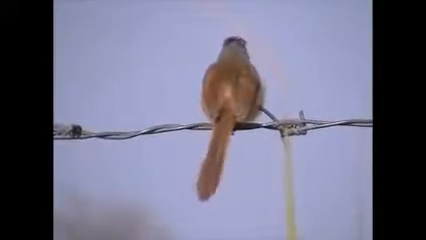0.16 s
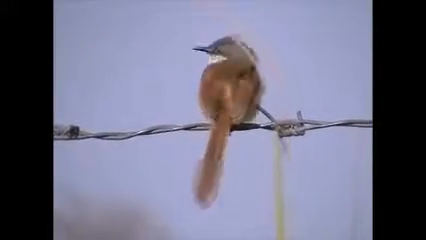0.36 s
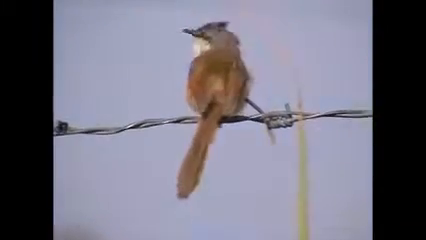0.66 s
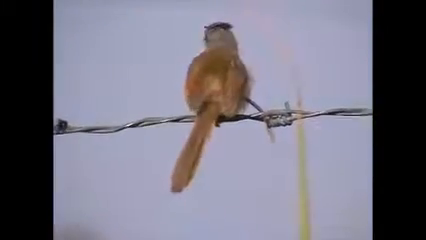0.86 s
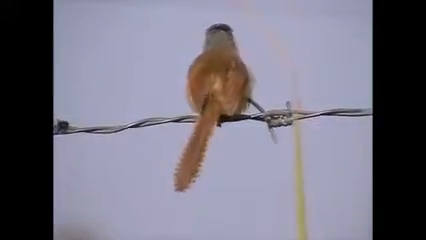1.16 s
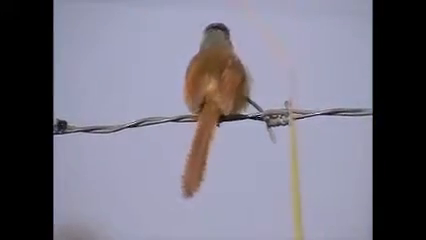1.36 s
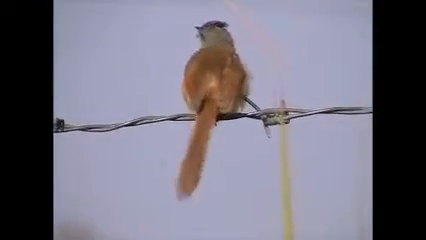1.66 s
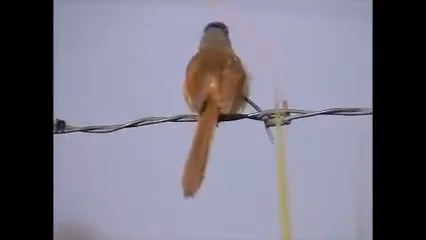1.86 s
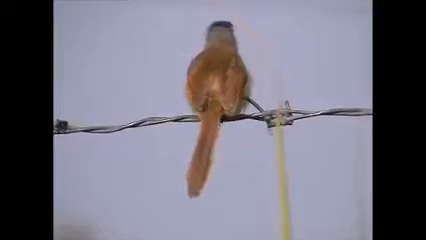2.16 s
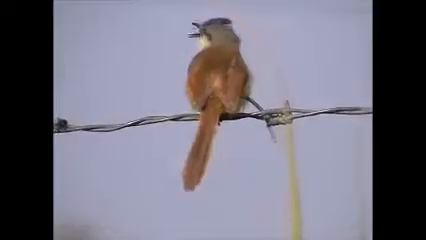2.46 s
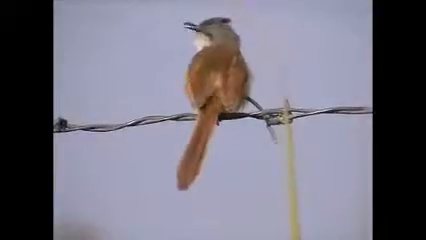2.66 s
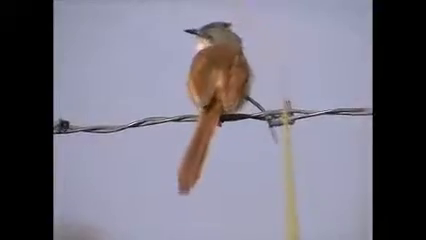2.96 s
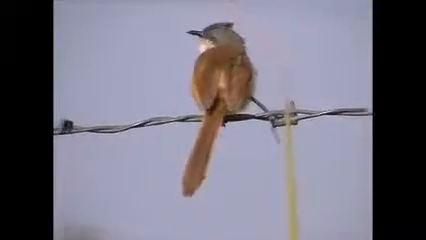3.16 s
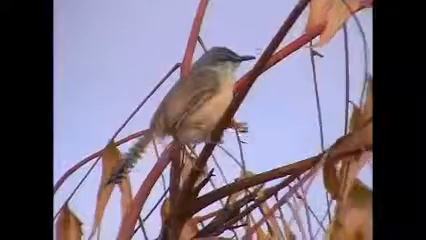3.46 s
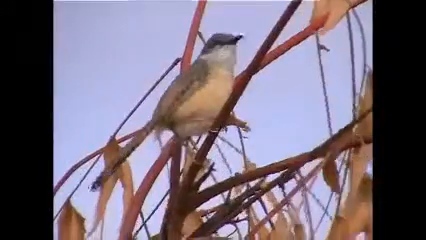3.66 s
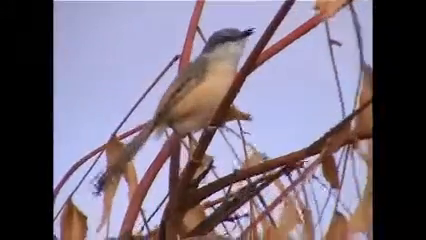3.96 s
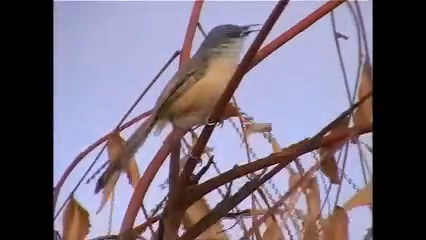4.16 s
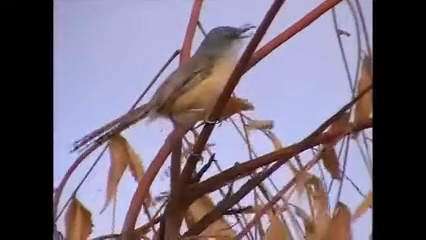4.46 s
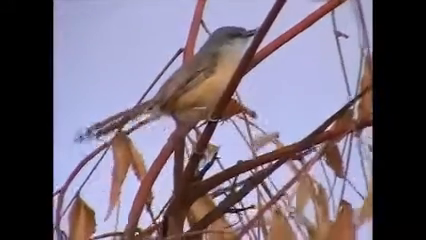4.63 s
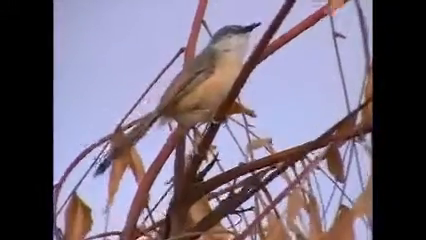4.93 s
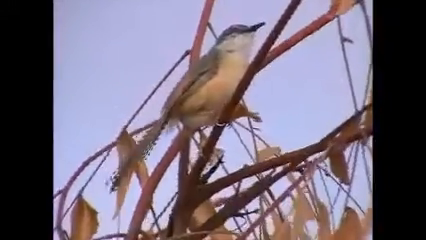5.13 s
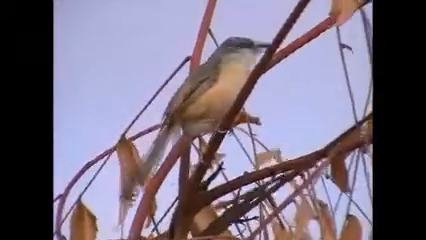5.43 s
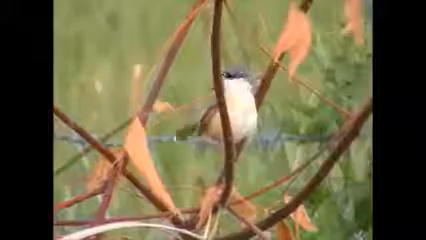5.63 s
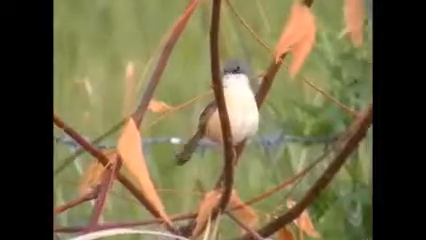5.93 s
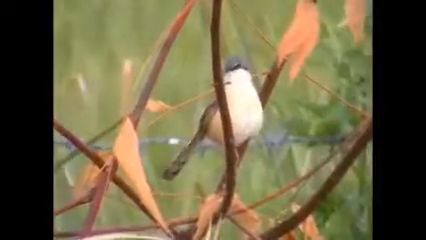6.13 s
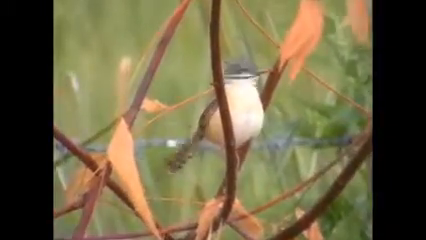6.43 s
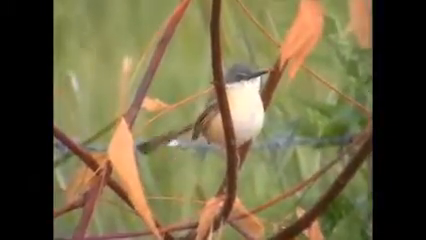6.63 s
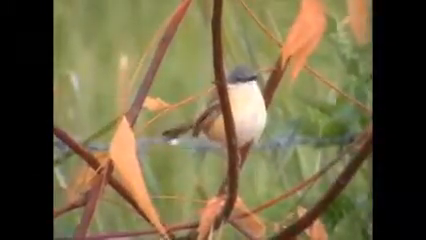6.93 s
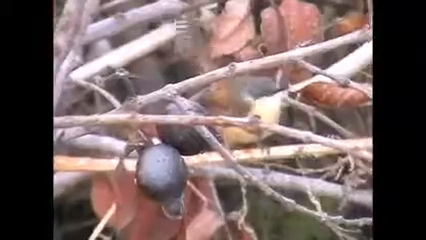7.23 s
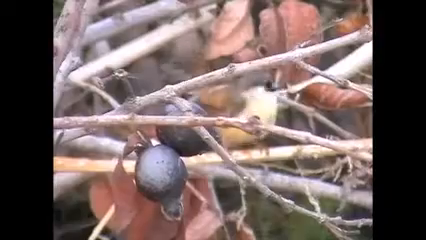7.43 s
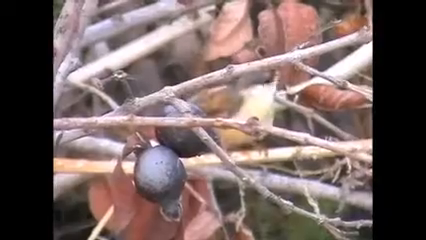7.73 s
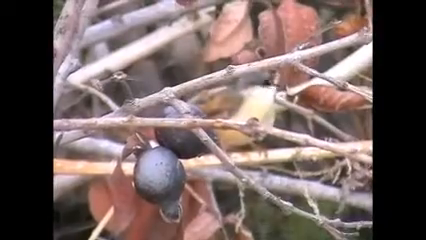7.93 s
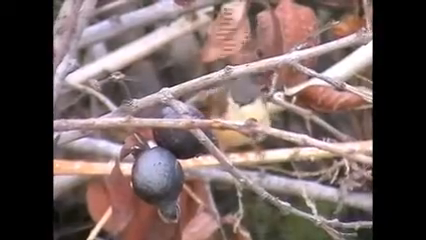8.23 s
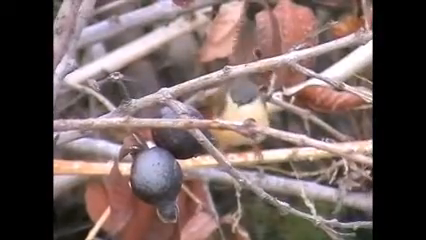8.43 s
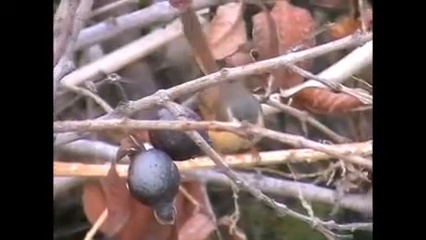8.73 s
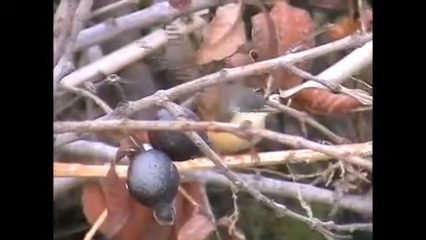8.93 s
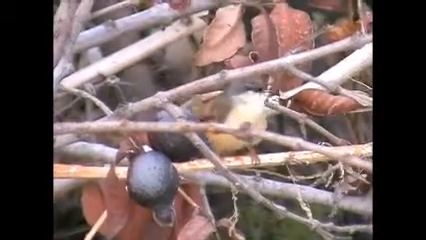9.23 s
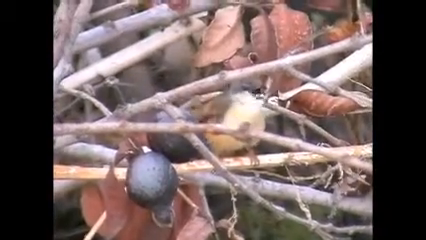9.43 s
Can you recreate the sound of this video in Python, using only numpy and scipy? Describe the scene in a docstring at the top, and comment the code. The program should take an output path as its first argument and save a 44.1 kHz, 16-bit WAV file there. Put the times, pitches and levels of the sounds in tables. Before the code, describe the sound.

Outdoors in open country, a small bird repeats short, sharp, high phrases: a tiny rippling run-up snapping into a bright whistle. After an opening series the song turns lower and softer, then brighter again, and finally loud, piercing and quick, with a pause before the last burst. Soft airy noise shifts abruptly between four sections. Other small birds twitter faintly, and a crow caws far off late. Fairly close microphone, slight scattered echo.

```python
"""A prinia sings runs of quick, high phrases in four sections of open-country sound.
Every note is a gliding whistle with a faint octave, and it rasps and hisses in steep sweeps.
Ground and twigs scatter the song back as a short wash of reflections and a longer, fainter echo.
Behind it: shaped-noise air with a hard cut at each new section, narrow-band drones, gliding whistles
of other small birds, a far crow of stacked harmonics, and a few ticks of fast-decaying noise."""
import sys
import numpy as np
from scipy import signal
from scipy.fft import rfft, irfft, next_fast_len
from scipy.io import wavfile
from scipy.ndimage import uniform_filter1d, minimum_filter1d

SR = 44100
rng = np.random.default_rng(int(sys.argv[2]) if len(sys.argv) > 2 else 0)


def file_out(sig):
    """Save sig as 16-bit WAV at sys.argv[1]."""
    # one column per channel
    cols = np.atleast_2d(sig).T
    # limit, then scale
    lim = np.clip(cols, -1, 1)
    pcm = np.round(lim * 32767).astype(np.int16)
    wavfile.write(sys.argv[1], SR, pcm)


N = 422919
TIME = np.arange(N) / SR


def undb(db):
    """Decibels to gain."""
    return 10 ** (np.asarray(db) / 20)


def unit(x):
    """Scale to rms 1."""
    return x / np.std(x)


def add(out, s, x):
    """Mix x in at time s."""
    i = max(int(s * SR), 0)
    out[i:i + len(x)] += x[:max(N - i, 0)]


def band(n, hz, width_hz):
    """Noise in a bell-shaped band, rms 1."""
    f = np.arange(n // 2 + 1) * SR / n
    bell = np.exp(-((f - hz) / width_hz) ** 2)
    return unit(irfft(rfft(rng.standard_normal(n)) * bell, n))


def walk(rate):
    """Random wander: straight lines between normal draws, rate draws per second."""
    steps = rng.standard_normal(int(N / SR * rate) + 2)
    return np.interp(TIME * rate, np.arange(len(steps)), steps)


def arch(length, peak=0.45):
    """Air pressure of one note: a rounded rise to its peak and a rounded fall."""
    u = np.linspace(0, 1, int(max(length, .004) * SR))
    rise_and_fall = np.interp(u, [0, np.clip(peak, .1, .9), 1], [0, .5, 1])
    return np.sin(np.pi * rise_and_fall)


def glide(n, start, middle, end):
    """Pitch bends in one smooth arc through three values."""
    curve = np.polyfit([0, .5, 1], [start, middle, end], 2)
    return np.polyval(curve, np.linspace(0, 1, n))


def phase_of(hz):
    """Phase of an oscillator that follows a pitch curve."""
    return 2 * np.pi * np.cumsum(hz) / SR


def echoes(x, t60, lag):
    """Many small reflections that begin after lag seconds and die away; the response has unit energy."""
    t = TIME[:int(t60 * SR)]
    # cubed noise: a few reflections stand out
    response = rng.standard_normal(len(t)) ** 3 * undb(-60 * t / t60)
    response = np.r_[np.zeros(int(lag * SR)), response / np.linalg.norm(response)]
    return signal.fftconvolve(x, response)[:N]


def whistle(length, start, middle, end, rasp_hz=0):
    """One arched note of a bird further off; noise in the pitch makes it rasp."""
    push = arch(length)
    n = len(push)
    hz = glide(n, start, middle, end) + rasp_hz * band(n, 0, 500)
    return push * np.sin(phase_of(hz))


def air(tilt_db):
    """Distant country noise; each band wavers on its own and the rumble swells most."""
    # spectrum of the country air: f/Hz, relative level/dB per Hz
    spectrum = [(25, -29), (55, -20), (95, -11), (140, -13.5), (200, -8.5), (320, -13.5), (700, -5),
                (1600, -4), (2700, -6.5), (4000, -14.5), (8000, -21), (12500, -36.5), (13800, -51)]
    # swells and lulls, before scaling in each band: t/s, level/dB
    swell_points = [(0, 6.5), (1.8, 6), (3.3, 4.5), (5.5, 4.5), (7.05, 3.5), (7.08, 0.5), (7.5, 0),
                    (7.8, 4)]
    n = next_fast_len(N)
    f = np.maximum(np.arange(n // 2 + 1) * SR / n, 1)
    hz, db = np.transpose(spectrum)
    colour_db = np.interp(np.log(f), np.log(hz), db)
    treble_db = tilt_db * np.log2(np.maximum(f, 1000) / 1000)
    noise = rfft(rng.standard_normal(n)) * undb(colour_db + treble_db)
    noise /= np.std(irfft(noise, n))
    swell = np.interp(TIME, *np.transpose(swell_points))
    zone = np.searchsorted([504, 1000, 1900, 3200], f)  # band edges, Hz
    out = np.zeros(N)
    for k in np.unique(zone):
        depth = 1.7 if k == 0 else .7  # band 0 is the rumble
        out += irfft(noise * (zone == k), n)[:N] * undb(1.3 * walk(11) + swell * depth)
    return out


def far_drones():
    """Narrow bands of noise hang in the distance as wavering tones for a while."""
    # faint drones: t/s, length/s, centre f/Hz, width/Hz, level/dB
    drones = [(0.682, 2.33, 770, 38, -59), (.68, 2.3, 1523, 70.6, -55), (3.9, 2.9, 1115, 58, -59.5),
              (7.699, 2.4, 674, 130, -59.5)]
    out = np.zeros(N)
    for s, length, hz, width_hz, db in drones:
        push = np.sqrt(arch(length, 0.13))
        add(out, s, undb(db) * push * band(len(push), hz, width_hz))
    return out


def far_whistler():
    """In the first section a far bird repeats falling whistles that overlap each other."""
    out = np.zeros(N)
    for s in np.arange(.8, 2.6, .11):
        shift = 1 + .035 * rng.standard_normal()
        add(out, s, whistle(0.23, 3080 * shift, 2730 * shift, 2450 * shift, rasp_hz=25))
    return undb(-50.5) * (out + .5 * echoes(out, t60=0.27, lag=0.0044))


def crow():
    """Far caws: a hoarse stack of harmonics on an arched pitch, heard only as reflections."""
    # caws: t/s, level of harmonics 2 to 4 ahead of the echoes/dB
    caws = [(7.22, -56), (8.06, -52), (8.43, -51), (8.75, -53), (9.11, -51)]
    out = np.zeros(N)
    for s, db in caws:
        push = arch(.16)
        n = len(push)
        phase = phase_of(glide(n, 520, 560, 510) + 45 * band(n, 0, 150))
        harmonics = .5 * np.sin(phase) + sum(np.sin(k * phase) for k in (2, 3, 4))
        add(out, s, undb(db) * push * harmonics)
    return echoes(out, t60=.2, lag=.005)


def neighbours():
    """Gliding calls, trills and stray chirps of other small birds, blurred by distance."""
    # single calls: t/s, length/s, start f/Hz, middle f/Hz, end f/Hz, peak level/dB, rasp/Hz rms
    calls = [(.08, 0.34, 2615, 2743, 2800, -51.5, 25), (.46, .26, 2750, 2763, 2860, -50, 25),
             (0.72, 0.021, 3200, 2850, 1880, -38, 700), (0.816, 0.18, 3030, 2756, 2870, -39, 224.4),
             (2.805, 0.16, 2424, 2325, 2290, -42.5, 90), (3.113, 0.057, 2640, 2580, 2554, -49, 50),
             (3.993, 0.094, 2990, 2555, 2870, -37.5, 200), (4.348, 0.15, 2485, 2000, 2044, -40.5, 270),
             (5.098, 0.13, 5720, 5260, 6400, -32.5, 55), (5.79, 0.043, 2760, 2425, 1950, -34, 40.6),
             (5.979, 0.072, 3100, 2720, 2590, -32.5, 44), (6.495, 0.078, 2010, 1910, 1900, -41.5, 40),
             (6.986, 0.044, 6250, 6350, 6460, -32, 450), (8.303, 0.03, 5400, 4630, 4100, -47, 60),
             (8.37, 0.11, 2620, 2770, 2710, -52.5, 69.4)]
    # trills: t/s, notes, spacing and note length/s, start f/Hz, middle f/Hz, end f/Hz, peak level/dB
    trills = [(6.141, 5, 0.012, 3200, 2680, 2450, -30.5), (6.757, 4, 0.025, 3370, 2610, 2500, -36),
              (7.306, 3, 0.028, 2670, 2899, 2700, -41.5)]
    # far chorus: from t/s, to t/s, chirps per second, mean level as gain/dB,
    # lowest f/Hz, highest f/Hz (of the unbent pitch), mean length/s
    chorus = [(0, 2.8, 25.3, -50, 2335, 4870, 0.072), (3.49, 8.6, 10.6, -49.5, 2960, 9100, 0.01),
              (7.13, 7.45, 25, -47, 4000, 9970, .012), (8.448, 9.05, 15, -48.5, 5000, 9500, .012),
              (5.746, 7.05, 90, -46, 1945, 6080, 0.023), (6.399, 6.65, 310, -51.5, 2010, 8760, 0.027)]
    out = np.zeros(N)
    for s, length, start, middle, end, db, rasp_hz in calls:
        add(out, s, undb(db) * whistle(length, start, middle, end, rasp_hz))
    for s, count, spacing, start, middle, end, db in trills:
        for k in range(round(count)):
            add(out, s + k * spacing, undb(db) * whistle(spacing, start, middle, end))
    for first, last, rate, db, low, high, length in chorus:
        span = last - first
        for when, pitch, slope, bend, size in rng.random((int(rate * span), 5)):
            hz, sweep = low * (high / low) ** pitch, 0.75 * (slope - .5)
            start, middle, end = hz * (1 - sweep), hz * (.95 + 0.12 * bend), hz * (1 + sweep)
            # longer chirps are also louder
            note = whistle(length * (.5 + size), start, middle, end)
            add(out, first + when * span, undb(db) * (.5 + size) * note)
    return out + undb(-3.5) * echoes(out, t60=0.19, lag=0.0024)


def ticks():
    """Short, bright snaps: noise around 7 kHz that decays within milliseconds."""
    # dry ticks: t/s, rms level of the noise ahead of its decay/dB
    snaps = [(3.761, -37), (5.443, -34.5)]
    out, t = np.zeros(N), TIME[:SR // 20]
    for s, db in snaps:
        add(out, s, undb(db) * np.exp(-t / .004) * band(len(t), 7000, 4000))
    return out


def song_patterns():
    """One song per section: a phrase is a run-up of quick notes, a main whistle and at times a tail."""
    # run-ups: t from the main whistle/s, length/s, start f/Hz, middle f/Hz, end f/Hz,
    # peak level/dB, place of the peak/0-1; each phrase stretches, detunes and scales them
    first_run_up = [(-.097, 0.044, 3330, 3448, 3516, -30.5, 1), (-.049, 0.012, 4580, 4045, 3530, -25, 0.64),
                    (-.034, .017, 4450, 4163, 3950, -21.5, 0.77), (-.018, .008, 4040, 4750, 4440, -26, 0.3)]
    second_run_up = [(-.134, 0.045, 3220, 2910, 2970, -34.5, 1),
                     (-.086, .013, 3610, 3740, 3850, -35.5, 0.46), (-.068, .015, 4210, 4020, 4250, -26, 1),
                     (-.05, .027, 4500, 4803, 4480, -23, .7), (-.021, .021, 3380, 3980, 4110, -24.5, 0.57)]
    third_run_up = [(-.131, 0.034, 3540, 3408, 3334, -26.5, 1), (-.094, .018, 4200, 3920, 4000, -29, .6),
                    (-.074, 0.014, 3950, 4280, 3970, -20.5, 0.64),
                    (-.059, 0.0077, 5450, 4740, 4680, -16, .75), (-.046, .017, 4950, 4950, 4880, -12, .85),
                    (-.024, 0.025, 3600, 4510, 4780, -19.5, 0.25)]
    fourth_run_up = [(-.054, .015, 6240, 5440, 5110, -13, 0.84),
                     (-.038, .021, 5610, 5374, 5010, -9.5, 0.62), (-.02, .016, 3080, 4030, 3900, -21.5, .5),
                     (-.01, .014, 8390, 7000, 6500, -20.5, .85)]
    # tails, varied likewise: t after the main whistle ends/s, length/s, start, middle and end pitch
    # [ratios to the main whistle's last pitch], peak level/dB, place of the peak/0-1
    first_tail = [(.01, 0.019, .88, 0.871, 0.78, -20, 0.66), (.025, .008, 0.96, .92, 0.88, -16.5, 0.63),
                  (.029, .035, .895, .935, .935, -16, 0.32)]
    third_tail = [(-0.012, 0.03, 1.02, .86, .83, -24, .65)]
    # phrases: main whistle: t/s, length/s, middle f/Hz, end f/Hz, peak level/dB, place of the peak/0-1;
    # other notes: level change/dB, time stretch [ratio], pitch of the opening note [ratio],
    # final bend of the loudest of them [pitch ratio]
    first_phrases = [(0, 0.017, 6590, 5840, -14, .2, -0.63, 1.1, 1, 1.03),
                     (.897, 0.03, 6700, 5950, -19, 0.78, -1.1, 0.97, .95, 1.1),
                     (1.188, 0.03, 6520, 5830, -13, 0.76, -0.81, 1, 0.986, 0.95),
                     (1.499, .032, 6795, 5895, -14.5, 0.73, 0.6, .97, 1.05, 0.98),
                     (1.823, 0.032, 6490, 5900, -17.5, 0.87, -0.13, 1.01, 1.01, 0.98),
                     (2.154, 0.032, 6500, 6105, -13.5, .9, 1.1, .98, 1.01, .98),
                     (2.482, 0.027, 6680, 5886, -18, 1, 0.93, 1.01, 1, 0.98),
                     (2.796, .032, 6640, 5840, -16.5, .9, 0.12, 1.03, 1, 1.03)]
    second_phrases = [(3.904, 0.025, 3970, 3520, -21.5, 0.28, -1.5, 1.05, .96, 1.02),
                      (4.215, .031, 3944, 3600, -21.5, 0.24, 0.5, 1.05, 1, .94),
                      (4.49, 0.032, 4050, 3500, -23.5, 0.39, -1, 1.05, 1, 1),
                      (4.774, 0.04, 4050, 3480, -23, 0.39, 1.5, 0.98, 1.06, 1.03),
                      (5.076, .025, 4050, 3610, -18, 0.21, 1, .93, 1.06, 1.03),
                      (5.372, 0.03, 3860, 3500, -21, 0.3, 0.5, 1.03, .945, 0.89)]
    third_phrases = [(5.972, 0.045, 6170, 5600, -6.5, 0.7, -1, 1.03, 1, 1.034),
                     (6.304, 0.021, 5930, 4650, -12.5, 0.82, 0.058, 1, 1.055, 1.018),
                     (6.603, 0.028, 5940, 4550, -18, 0.71, 1, 1, 1.016, .99)]
    fourth_phrases = [(7.511, 0.026, 6510, 7200, -4.5, 0.29, 0.6, 0.99, 1.038, 1.075),
                      (7.63, 0.024, 6246, 6340, -5, 0.58, 0.9, 1.02, 1.02, .98),
                      (7.757, 0.039, 6160, 5680, -5, 0.35, -.5, 1.01, 0.97, 0.96),
                      (7.931, 0.033, 6260, 6480, -2.5, .5, -1, 1.03, 1, 1.015),
                      (8.065, 0.025, 6413, 6990, -6.5, 0.53, -1.06, 1.06, 0.97, 0.983),
                      (9.261, 0.024, 6470, 6100, -7, 0.4, -1.1, 0.95, 1.057, 1.054),
                      (9.38, 0.03, 6220, 5610, -7.5, 0.32, 1, 1.04, 1, .97),
                      (9.513, 0.03, 6250, 6100, -4, 0.43, 0.26, 1, 0.96, 1)]
    # last column: first pitch of the main whistle as a ratio to its middle
    return [(first_phrases, first_run_up, first_tail, 1.038),
            (second_phrases, second_run_up, [], 1.52),
            (third_phrases, third_run_up, third_tail, .94),
            (fourth_phrases, fourth_run_up, [], 1.04)]


def sing(phrases, run_up, tail, entry):
    """The run-up leads into the main whistle, and the tail carries on from its last pitch."""
    # no two phrases are alike: random spread of the small notes
    pitch_spread, level_spread_db = 0.0074, 1.32  # pitch as a share
    notes = []
    loudest = max(run_up + tail, key=lambda note: note[5])
    for s, held, hz, last_hz, main_db, main_peak, effort_db, stretch, opening, bend in phrases:
        notes.append((s, held, entry * hz, hz, last_hz, main_db, main_peak))
        for figure, anchor, pitch_scale in ((run_up, s, 1), (tail, s + held, last_hz)):
            for note in figure:
                offset, length, *pitches, db, peak = note
                off_pitch, off_level = rng.standard_normal(2)
                arc = np.array(pitches) * pitch_scale * (1 + pitch_spread * off_pitch)
                if note is run_up[0]:
                    arc *= opening
                if note is loudest:
                    arc *= bend ** np.array([0, .5, 1])
                note_db = db + effort_db + level_spread_db * off_level
                notes.append((anchor + offset * stretch, length * stretch, *arc, note_db, peak))
    # notes that would start before time 0 are left out
    return [note for note in notes if note[0] >= 0]


def prinia(notes, second_db, rasp_hz):
    """Level syrinx whistles are smooth; in a steep sweep the membrane flutters and the note rasps."""
    hiss_db = -26.5  # scales the hiss, which also follows the note and its strain
    out = np.zeros(N)
    for s, length, start, middle, end, db, peak in notes:
        push = arch(length, peak)
        n = len(push)
        hz = glide(n, start, middle, end)
        strain = np.minimum(np.abs(np.gradient(hz)) * SR / 60000, 1)  # full at 60 kHz per second
        phase = phase_of(hz + strain * rasp_hz * band(n, 300, 540))
        flutter = undb(2.2 * strain * band(n, 150, 150))
        # the throat lets the octave of low notes through best
        octave = undb(second_db) * (4500 / hz) ** 2 * np.sin(2 * phase)
        # loud, steep sweeps hiss the most: note level and push count here and again in the mix
        hiss = undb(db + hiss_db) * (.1 + strain ** 2) * push * band(n, 8000, 4100)
        add(out, s, undb(db) * push * (flutter * np.sin(phase) + octave + hiss))
    return out


def scene():
    """Four sections, each with its own song, echo and background noise; a faint diffuse part adds width."""
    # sections: from t/s, octave level for a 4500 Hz note/dB, pitch rasp at full strain/Hz rms,
    # twig scatter/dB, its decay/s, far echo/dB, air level ahead of its swell/dB,
    # air tilt above 1 kHz/dB per octave
    sections = [(0, -40.5, 102, -8.5, 0.082, -30, -55.5, -0.5),
                (3.41, -29.5, 110, -4.5, 0.066, -25, -53.5, 2),
                (5.6, -40.5, 100, -6.5, 0.052, -32, -51.5, 0.4),
                (7.066, -35.5, 120, -7.5, 0.052, -35.5, -54.5, 1.5)]
    song, backdrop = np.zeros(N), np.zeros(N)
    ends = [row[0] for row in sections[1:]] + [N / SR]
    for section, end, pattern in zip(sections, ends, song_patterns()):
        start, second_db, rasp_hz, twig_db, twig_s, far_db, air_db, tilt_db = section
        voice = prinia(sing(*pattern), second_db, rasp_hz)
        twigs = undb(twig_db) * echoes(voice, t60=twig_s, lag=0.0028)
        far_echo = undb(far_db) * echoes(voice, t60=0.96, lag=0.027)
        song += voice + twigs + far_echo
        # the background noise is joined by hard cuts
        backdrop += undb(air_db) * air(tilt_db) * ((TIME >= start) & (TIME < end))
    # a short silence of the background noise at the cut between the first two sections
    backdrop *= (TIME < 3.395) | (TIME > 3.42)
    mid = backdrop + far_drones() + far_whistler() + crow() + neighbours() + ticks() + song
    # the side part is added left and subtracted right
    side = echoes(undb(-20) * backdrop + undb(-34) * song, t60=.04, lag=.002)
    return np.array([mid + side, mid - side])


def record(dry):
    """A quick limiter holds the loudest whistles down; a steep low-pass cuts the top."""
    size = SR // 250  # 4 ms window
    wanted = np.minimum(1, undb(-2.7) / (np.abs(dry).max(axis=0) + 1e-9))
    gain = uniform_filter1d(minimum_filter1d(wanted, size), size)
    low_pass = signal.ellip(8, .2, 70, 15500, fs=SR, output="sos")
    return signal.sosfilt(low_pass, dry * gain)


dry = scene()
out = record(dry)
file_out(out)
```